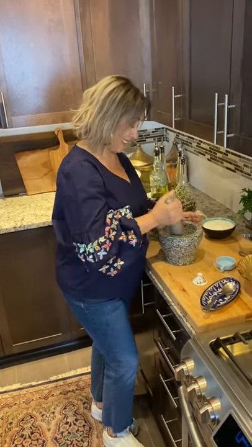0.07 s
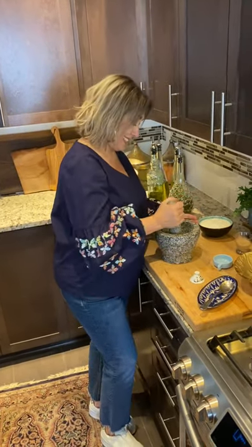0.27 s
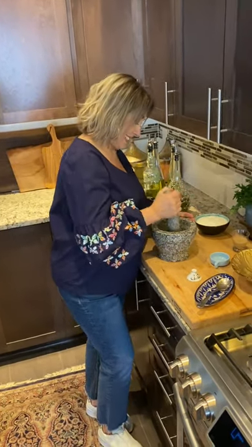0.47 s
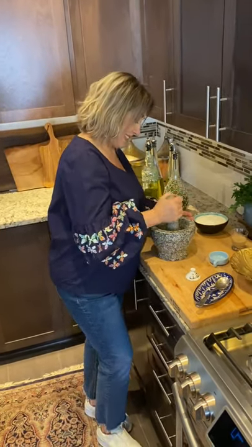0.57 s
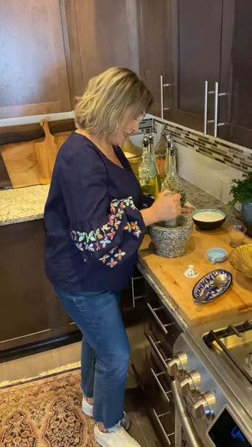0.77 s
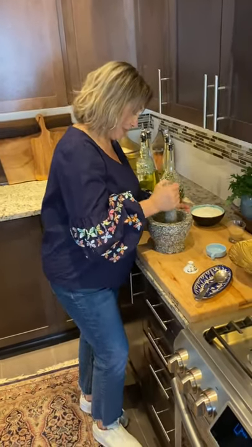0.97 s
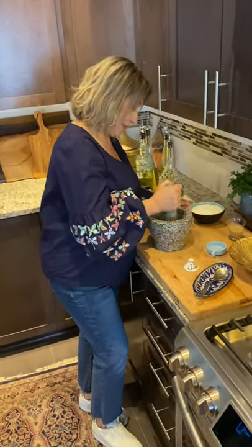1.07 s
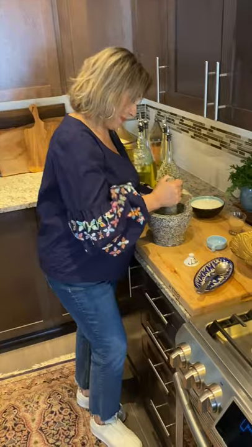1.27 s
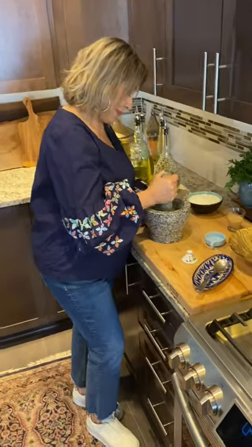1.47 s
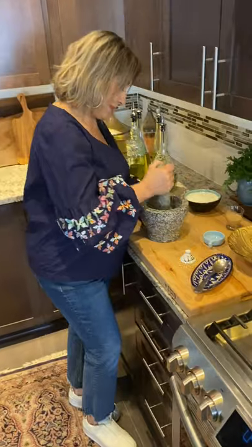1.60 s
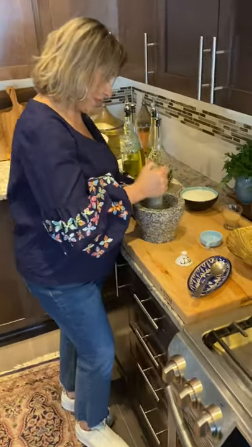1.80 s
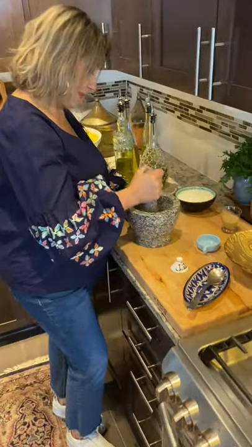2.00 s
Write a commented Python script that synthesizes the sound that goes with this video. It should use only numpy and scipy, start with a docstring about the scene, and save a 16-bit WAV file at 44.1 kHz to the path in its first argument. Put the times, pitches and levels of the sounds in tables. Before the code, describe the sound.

A stone pestle pounding in a stone mortar, one sharp clack then steady crunchy thumps.

```python
"""Garlic in a stone mortar

A stone pestle pounds garlic and salt in a mortar on a wooden board, in a small kitchen.
The first blow lands stone on stone: it clacks, rings and overloads the microphone. The others
are cushioned: salt crunches, the worktop thumps, the room booms, and the mortar rocks and knocks."""
import sys
import numpy as np
from scipy import signal
from scipy.fft import rfft, irfft, next_fast_len
from scipy.io import wavfile
from scipy.ndimage import map_coordinates

SR = 44100
rng = np.random.default_rng(int(sys.argv[2]) if len(sys.argv) > 2 else 0)


def master(y):
    """Save y as 16-bit WAV."""
    cut = np.clip(np.atleast_2d(y).T, -1, 1)
    pcm = np.round(cut * 32767)  # scale
    wavfile.write(sys.argv[1], SR, pcm.astype(np.int16))


N = 90404

# cushioned blows: t/s, crunch/dB, crunch half-width/s, garlic squash/dB, thump/dB
BLOWS = [(0.5173, -26, 0.0024, -44.5, -10), (0.7519, -25.5, 0.0031, -41.5, -4.5),
         (0.9886, -26, 0.0032, -41.5, -4.5), (1.2177, -24.5, 0.0019, -32.5, -3.5),
         (1.4580, -30, 0.0037, -41.5, -5), (1.7297, -32, .0026, -31.5, -1.5),
         (1.9864, -25.5, 0.0022, -36, -3.5)]
# stone on stone: t/s, mortar ring/dB, pestle ring/dB, clack/dB, clack t60/s, clack cutoff/Hz,
# board/dB, rise/s
STRIKES = [(0.1524, -54, -77, -32.5, 0.0099, 2500, -42.5, 0.00016),
           (0.165, -54, -88.5, -34.5, 0.041, 1500, -70, 0.00054),
           (0.2458, -6, -47, 5, 0.099, 14150, 7.5, 0.00019),
           (.277, -8.5, -13, -13, 0.094, 14000, -23, 0.0016),
           (1.726, -36, -73, -21.5, 0.015, 4020, -46.5, 0.00051),
           (1.7505, -31, -21, -23, 0.067, 12440, -19, 0.0053)]
# clack spectrum: f/Hz, level/dB
CLACK_SPECTRUM = [(40, -37), (150, -2.5), (400, -19.5), (900, -1), (1600, -3.5), (2400, -3.5),
                  (3200, -11.5), (4500, -15.5), (8000, -24.5), (15000, -26)]
STONE_WANDER_RAD = 1.1


def amp(db):
    """Decibels to gain."""
    return 10 ** (np.asarray(db) / 20)


def fade(t, t60_s):
    """Exponential decay from t = 0."""
    return np.exp(-np.log(1000) * np.maximum(t, 0) / t60_s) * (t >= 0)


def rise(t, rise_s):
    """Soft start at t = 0."""
    return 1 - np.exp(-np.maximum(t, 0) / rise_s)


def since(at_s):
    """Time after at_s, per sample."""
    return np.arange(N) / SR - at_s


def along(points, hz):
    """Interpolate (f/Hz, value) points on a log axis."""
    f, values = np.transpose(points)
    return np.interp(np.log(hz + 1), np.log(f + 1), values)


def filtered(x, response):
    """Apply a gain given as a function of frequency."""
    size = next_fast_len(N + SR // 4)
    hz = np.fft.rfftfreq(size, 1 / SR)
    return irfft(rfft(x, size) * response(hz), size)[:N]


def noise(spectrum, cutoff_hz=np.inf):
    """Coloured noise, dulled above the cutoff; rms 1."""
    x = filtered(rng.standard_normal(N), lambda hz: amp(along(spectrum, hz)) / np.hypot(1, hz / cutoff_hz))
    return x / x.std()


def wobble(count, knots_per_s=160):
    """Smooth random curve, count samples long."""
    return map_coordinates(rng.standard_normal(200), [np.arange(count) * knots_per_s / SR], mode="mirror")


def ring(modes, t, wander_rad=0):
    """Damped modes with optional phase wander."""
    out = np.zeros(N)
    live = (t >= 0) & (t < 0.5)
    age_s = t[live]
    for hz, db, t60_s in modes:
        phase = 2 * np.pi * hz * age_s + wander_rad * wobble(len(age_s))
        out[live] += amp(db) * np.sin(phase) * fade(age_s, t60_s)
    return out


def room_tone():
    """Quiet air noise, faint appliance hum and an earlier blow's dying reverberation."""
    # air spectrum: f/Hz, level/dB
    air_spectrum = [(15, -5), (25, 9.5), (161, 0.5), (212, -3), (373, 1), (451, -7), (659, -3), (754, -7),
                    (887, -2), (988, -10.5), (1840, -16), (2990, -23.5), (16000, -43)]
    # appliance tones: f/Hz, level/dB
    hum_tones = [(504, -49), (893, -53)]
    t = since(0)
    air = amp(-42) * noise(air_spectrum)
    hum = sum(amp(db) * np.sin(2 * np.pi * hz * t) for hz, db in hum_tones)
    tail = amp(-46.5) * noise(CLACK_SPECTRUM) * fade(t, t60_s=0.69)
    return air + hum + tail


def kitchen(x):
    """Reverberation off cupboards and tiles: a noise tail decaying band by band."""
    # room decay: f/Hz, t60/s
    decay_times = [(70, 0.67), (200, 0.48), (800, 0.45), (3000, 0.4), (8000, 0.74), (15000, 0.33)]
    # reverberation gain: f/Hz, level/dB
    wet_levels = [(70, -8), (200, -9.5), (800, -10.5), (3000, -9), (8000, -23), (15000, -15.5)]
    hz, t, bands = signal.stft(rng.standard_normal(SR * 3 // 4), SR, nperseg=256)
    t60_s = along(decay_times, hz)[:, None]
    unit_energy = np.sqrt(2 * np.log(1000) / (t60_s * SR))
    _, tail = signal.istft(bands * fade(t, t60_s) * unit_energy, SR, nperseg=256)
    tail *= rise(np.arange(len(tail)) / SR, rise_s=0.002)
    return filtered(signal.fftconvolve(x, tail)[:N], lambda f: amp(along(wet_levels, f)))


def thump_and_boom():
    """Each blow, bare or cushioned, thumps the worktop and excites low room modes."""
    # two low room modes that boom on, then the worktop's short thump modes: f/Hz, level/dB, t60/s
    modes = [(65.6, -23, 0.62), (81.8, -21.5, 0.47), (94.8, 2, 0.081), (129.6, -4, 0.1124),
             (180, -17.5, 0.25)]
    lag_s, attack_s = 0.00027, 0.0093
    bare_blow_s, bare_blow_db = 0.247, 0.5
    pushes = [(at_s + lag_s, db) for at_s, *_, db in BLOWS] + [(bare_blow_s, bare_blow_db)]
    return sum(amp(db) * rise(since(at_s), attack_s) * ring(modes, since(at_s)) for at_s, db in pushes)


def rocking():
    """The mortar settles on the board with short, dull knocks."""
    # foot knocks: t/s, level/dB, t60/s, cutoff/Hz
    knocks = [(0.524, -27.5, 0.15, 210), (.755, -14.5, 0.037, 500), (0.766, -11, 0.065, 710),
              (.994, -20, 0.08, 700), (1.008, -11.5, 0.047, 580), (1.222, -13, 0.069, 996),
              (1.241, -15, 0.15, 496), (1.468, -10.5, 0.066, 710), (1.736, -9, 0.11, 800),
              (1.995, -11.5, 0.092, 880), (2.004, -27, 0.148, 770)]
    # knock spectrum: f/Hz, level/dB
    spectrum = [(110, -1), (185, -6), (240, -1.5), (330, 0), (560, -5.5), (850, -3), (1100, -18),
                (1400, -12.5), (1900, -43), (4000, -30), (9000, -55)]
    out = np.zeros(N)
    for at_s, db, t60_s, cutoff_hz in knocks:
        t = since(at_s)
        out += amp(db) * rise(t, rise_s=0.005) * fade(t, t60_s) * noise(spectrum, cutoff_hz)
    return out


def board_bark(low_cut_hz=66):
    """Bare contact makes the mortar bark on its wooden board."""
    # modes of the mortar on the board: f/Hz, level/dB, t60/s
    modes = [(376.5, -9.5, 0.13), (567.3, -4, .15), (636.4, -2.5, 0.081), (716.5, -7.5, 0.079),
             (752.5, 2, 0.097), (835, 3.5, 0.063), (938.7, 0.5, 0.065), (1262, -13, 0.16),
             (1434, -22.5, 0.3)]
    out = np.zeros(N)
    for at_s, *_, db, rise_s in STRIKES:
        t = since(at_s)
        out += amp(db) * rise(t, rise_s) * ring(modes, t, wander_rad=0.57)
    return signal.sosfilt(signal.butter(2, low_cut_hz, "high", fs=SR, output="sos"), out)


def pestle_skid(at_s=1.7502, half_width_s=0.003, hz=862):
    """The bowl resonates briefly as the pestle slips down its wall."""
    t = since(at_s)
    envelope = amp(-10) * np.exp(-0.5 * (t / half_width_s) ** 2)
    return envelope * np.sin(2 * np.pi * hz * t + STONE_WANDER_RAD * wobble(N))


def grit(spread_db=5.5, grain_samples=16):
    """Dense tiny fractures of very uneven size; rms 1."""
    # crunch spectrum: f/Hz, level/dB
    spectrum = [(300, 3.5), (1500, -8), (3000, -6), (5200, -4), (7000, -4), (10000, -6.5), (13000, -12.5),
                (15500, -19)]
    grain_db = spread_db * rng.standard_normal(N // grain_samples + 1)
    sizes = amp(np.repeat(grain_db, grain_samples)[:N])
    x = filtered(sizes * rng.standard_normal(N), lambda hz: amp(along(spectrum, hz)))
    return x / x.std()


def salt_and_garlic():
    """Salt crunches under the pestle, garlic squashes, stray grains crack."""
    # stray grain cracks: t/s, level/dB
    cracks = [(1.3355, -41), (1.377, -48.5), (1.4697, -37), (1.48, -39)]
    envelope = np.zeros(N)
    for at_s, crunch_db, half_width_s, squash_db, _ in BLOWS:
        t = since(at_s)
        envelope += amp(crunch_db) * np.exp(-0.5 * (t / half_width_s) ** 2)
        envelope += amp(squash_db) * rise(t, half_width_s) * fade(t, t60_s=0.14)
    for at_s, db in cracks:
        envelope += amp(db) * fade(since(at_s), t60_s=0.011)
    return envelope * grit()


def stone_ring():
    """Mortar and pestle ring briefly after bare contact."""
    # mortar modes: f/Hz, level/dB, t60/s
    mortar_modes = [(2359, 0, 0.095), (2821, -8.5, .15), (3074, -6, 0.166), (4380, -13.5, 0.28),
                    (4797, -3, 0.15), (5910, -11.5, 0.21), (6810, -10, 0.19), (7160, -12.5, 0.25),
                    (8070, -19, 0.16), (9631, -32.5, 0.19), (10870, -22, 0.25), (12600, -21.5, 0.22),
                    (16500, -25, .15)]
    # pestle modes: f/Hz, level/dB, t60/s
    pestle_modes = [(3122, -1, 0.074), (3347, 2.5, 0.055), (4060, -10, 0.09), (4900, -3, 0.083),
                    (5410, -7.5, .1), (7450, -5.5, 0.086), (8300, -28, .1), (9500, -22, 0.33),
                    (9670, -6, 0.055), (11000, -31.5, .09), (13060, -19.5, .11)]
    out = np.zeros(N)
    for at_s, mortar_db, pestle_db, *_, rise_s in STRIKES:
        t = since(at_s)
        mortar = amp(mortar_db) * ring(mortar_modes, t, STONE_WANDER_RAD)
        pestle = amp(pestle_db) * ring(pestle_modes, t, STONE_WANDER_RAD)
        out += rise(t, rise_s) * (mortar + pestle)
    return out


def stone_clack():
    """Bare contact gives a short, rough clack; light touches are duller."""
    out = np.zeros(N)
    for at_s, _, _, db, t60_s, cutoff_hz, _, rise_s in STRIKES:
        t = since(at_s)
        out += amp(db) * rise(t, rise_s) * fade(t, t60_s) * noise(CLACK_SPECTRUM, cutoff_hz)
    return out


def scene():
    """Direct sound, reverberation and room tone; mono."""
    clack, ringing, bark, thump = stone_clack(), stone_ring(), board_bark(), thump_and_boom()
    crush = salt_and_garlic() + rocking() + pestle_skid()
    sources = clack + ringing + bark + thump + crush
    # ringing, bark and thump feed the reverberation more weakly
    reverb = kitchen(clack + amp(-4) * ringing + amp(-2) * bark)
    reverb += kitchen(crush + amp(-3.5) * thump)
    return (sources + reverb + room_tone())[None]


def record(dry):
    """The microphone clips on the hardest blow and is band-limited."""
    top_hz = 16000
    lowpass = signal.ellip(8, 0.1, 60, top_hz, fs=SR, output="sos")
    return signal.sosfilt(lowpass, np.clip(dry, -1, 1))


dry = scene()
out = record(dry)
master(out)
```